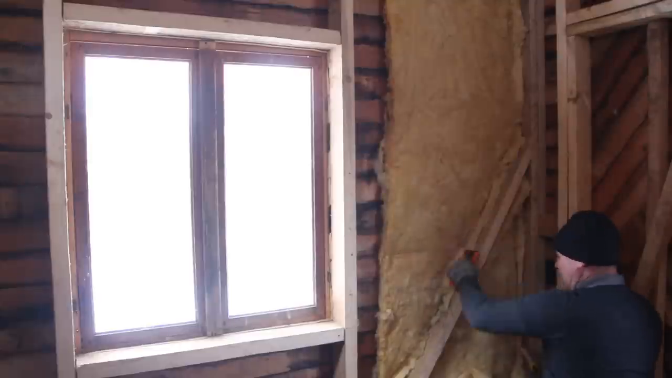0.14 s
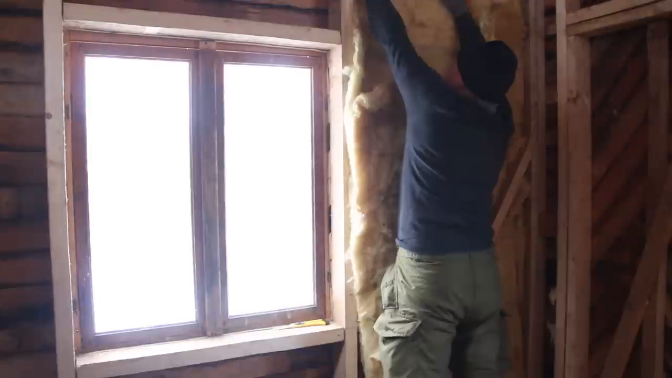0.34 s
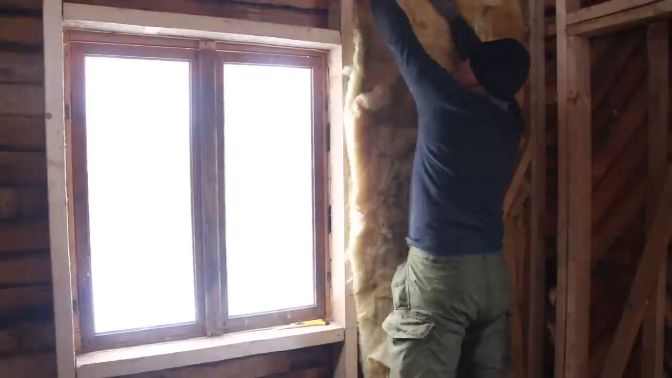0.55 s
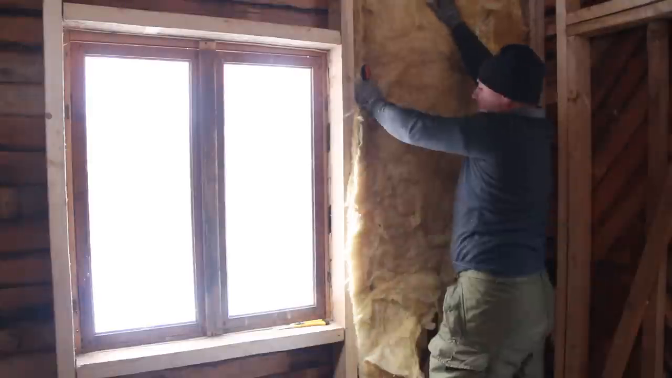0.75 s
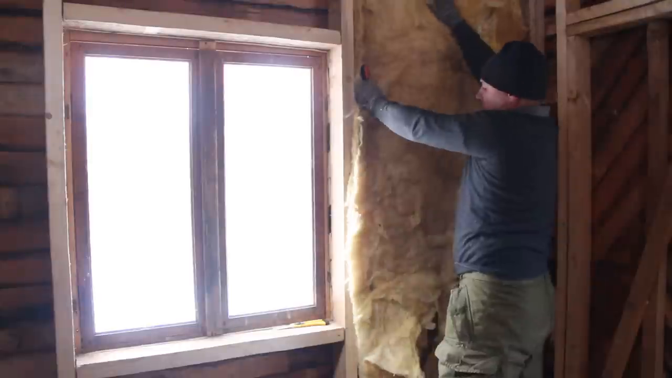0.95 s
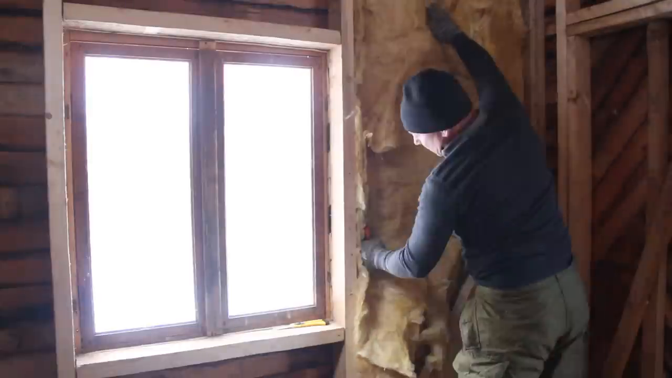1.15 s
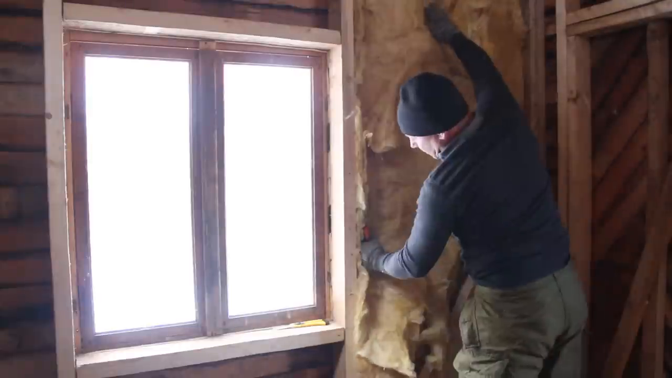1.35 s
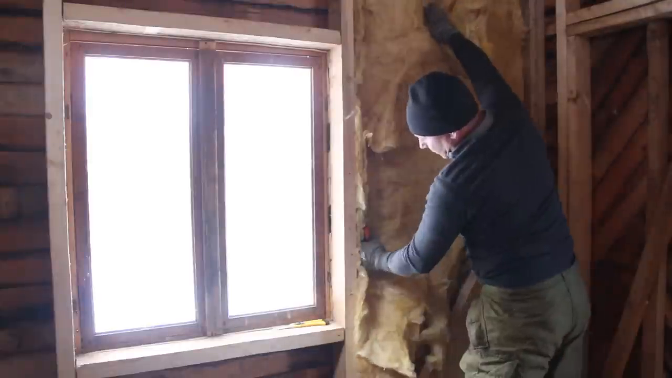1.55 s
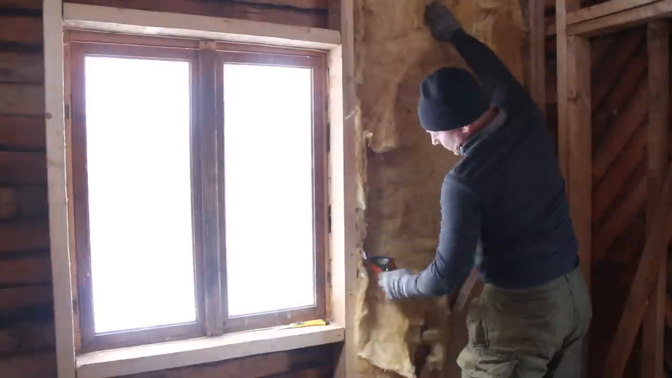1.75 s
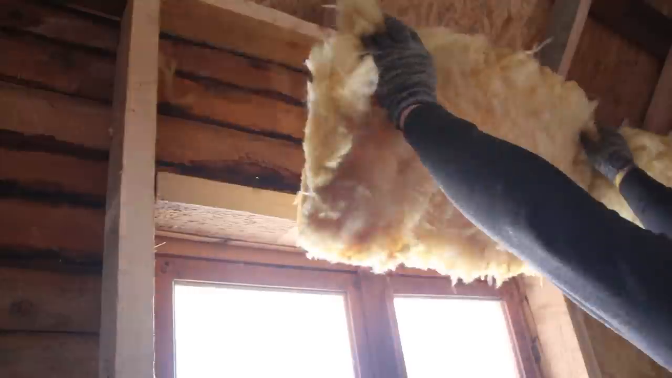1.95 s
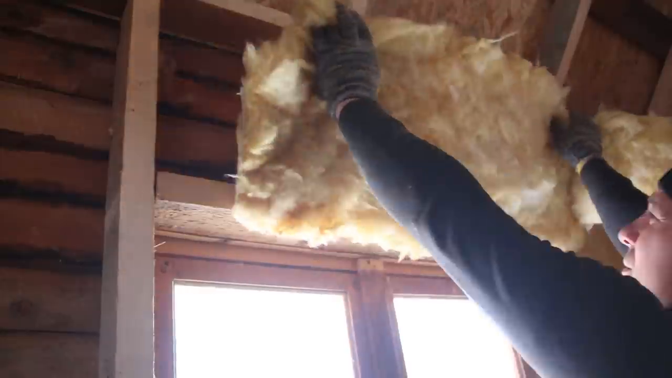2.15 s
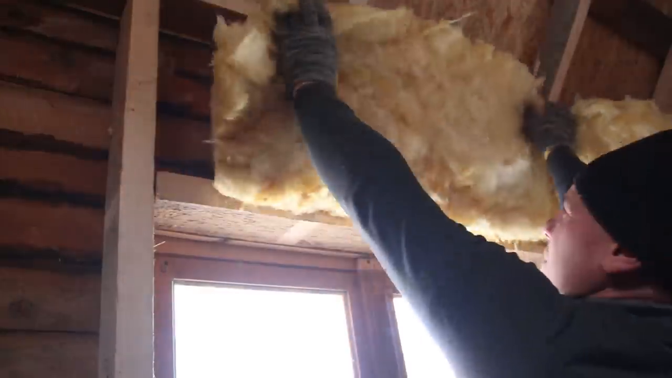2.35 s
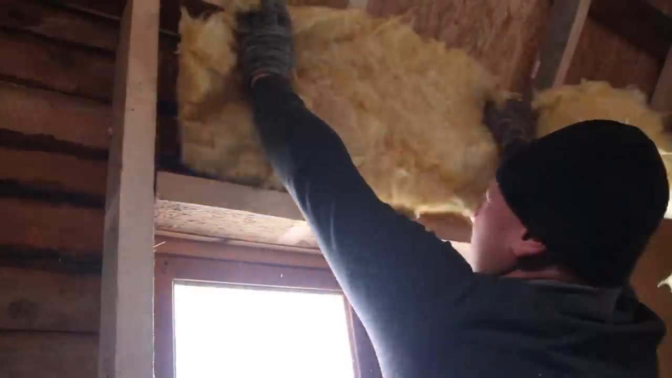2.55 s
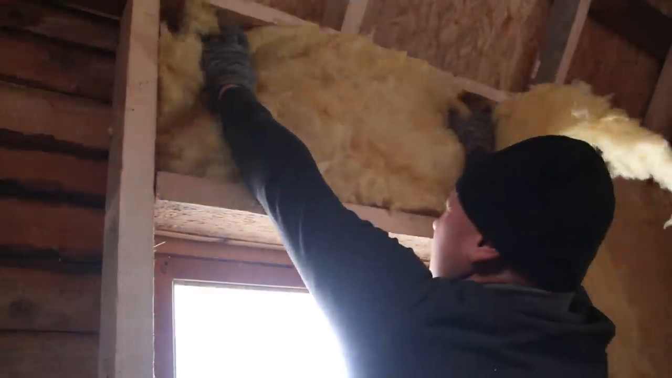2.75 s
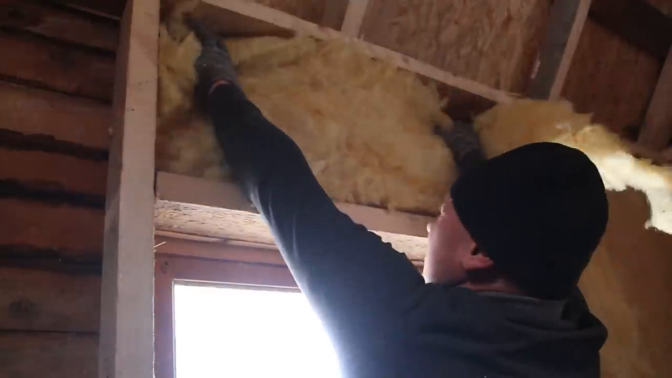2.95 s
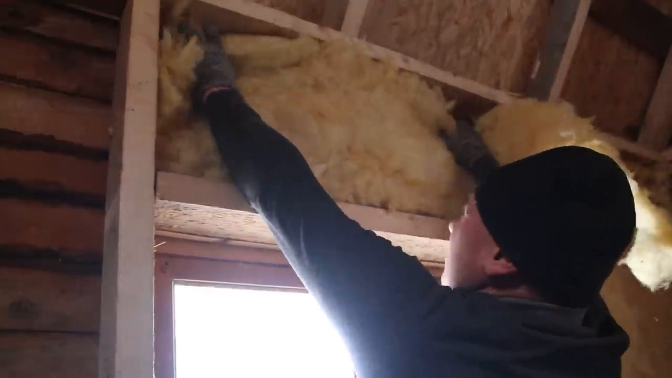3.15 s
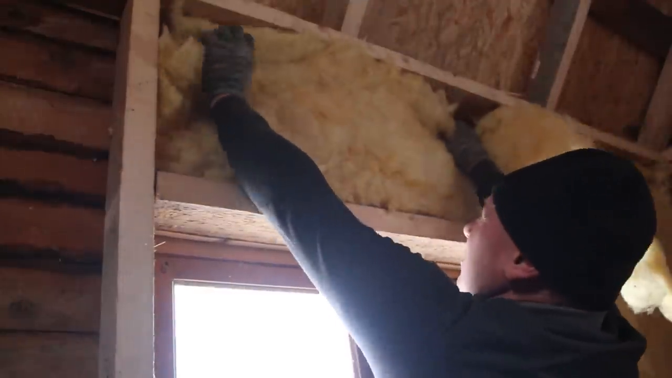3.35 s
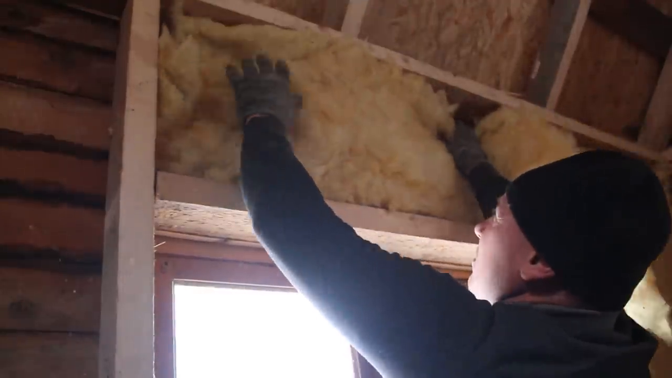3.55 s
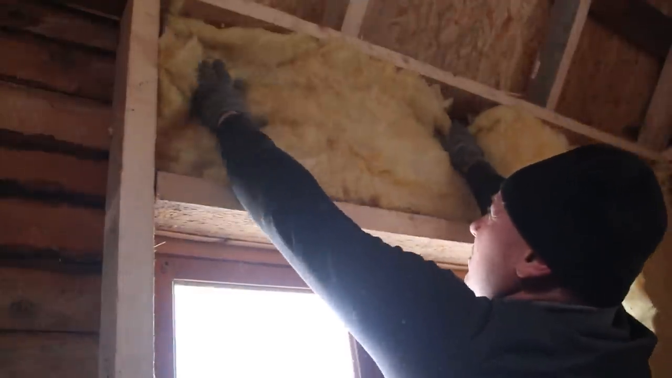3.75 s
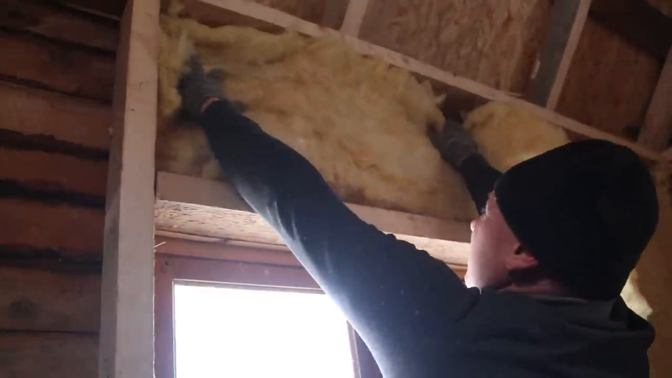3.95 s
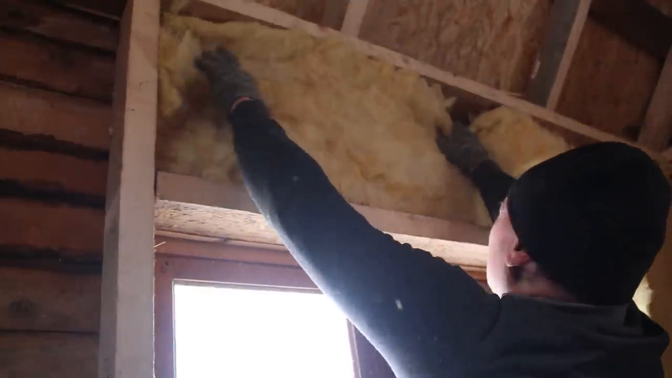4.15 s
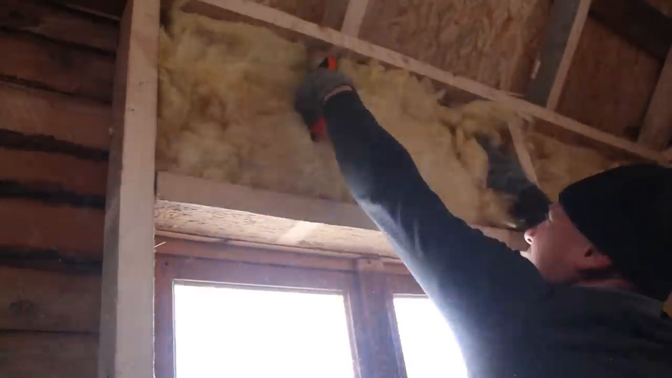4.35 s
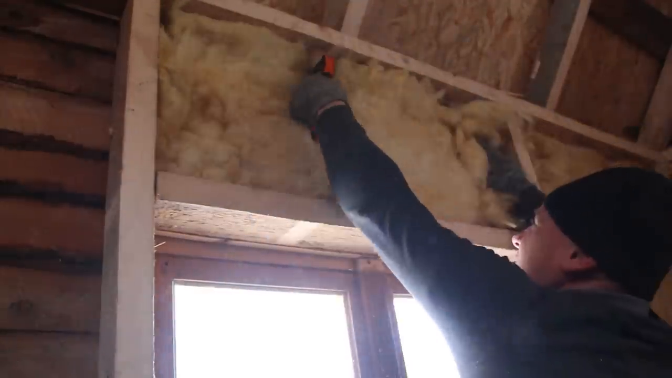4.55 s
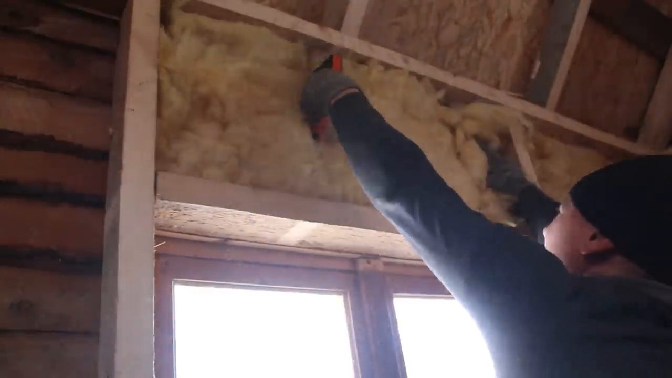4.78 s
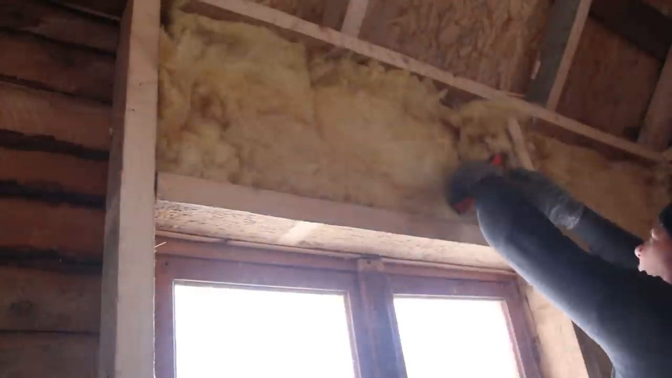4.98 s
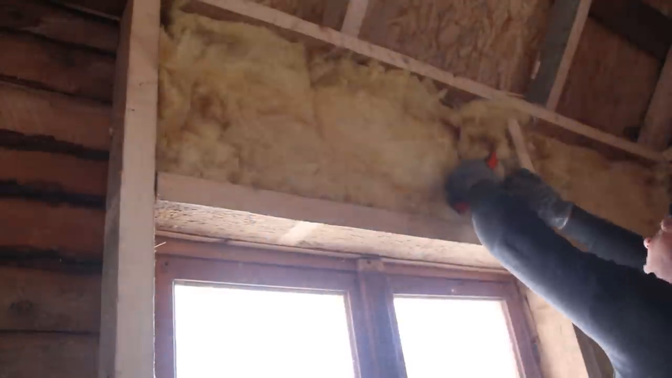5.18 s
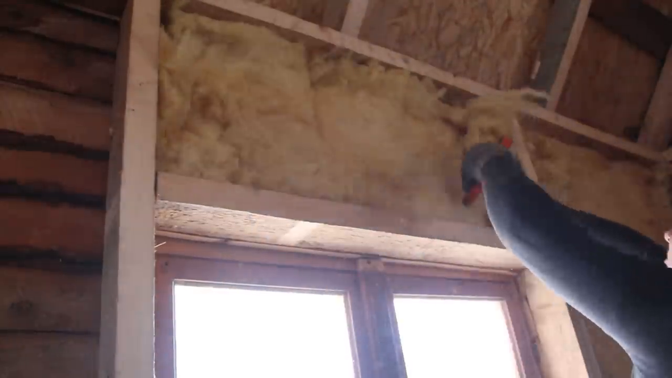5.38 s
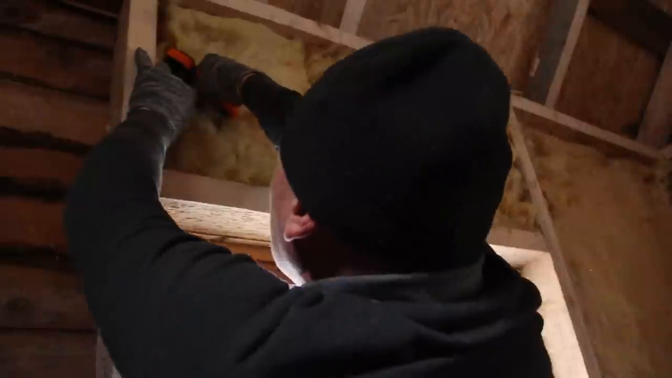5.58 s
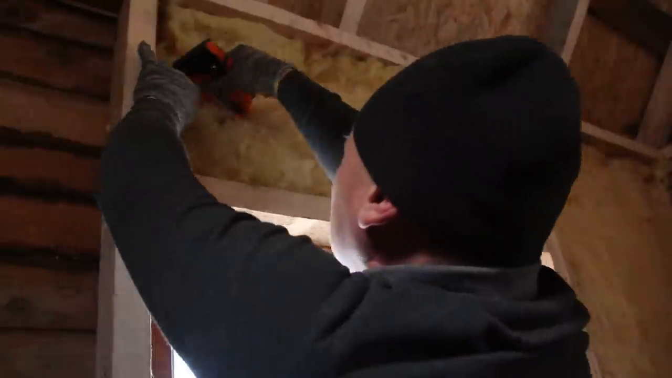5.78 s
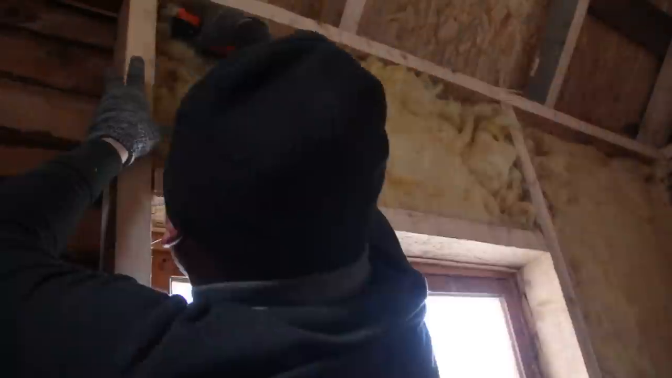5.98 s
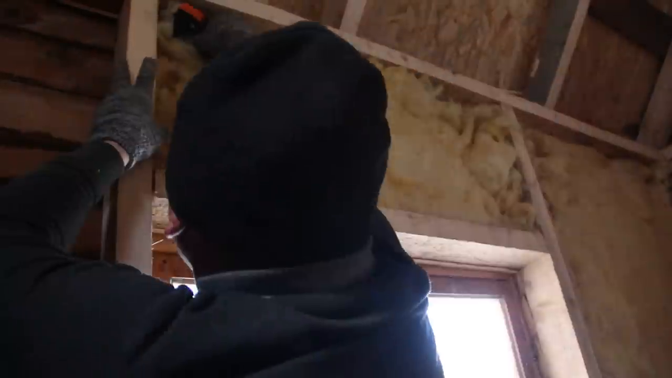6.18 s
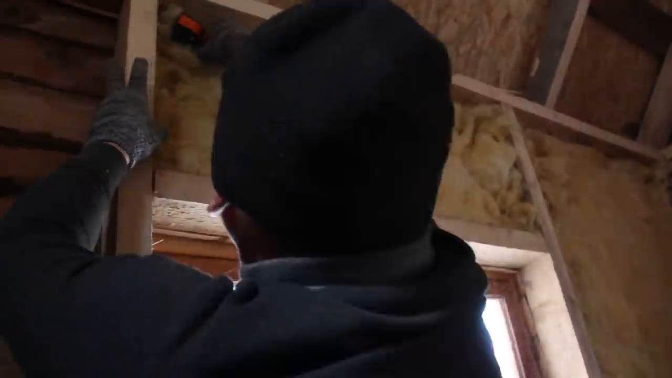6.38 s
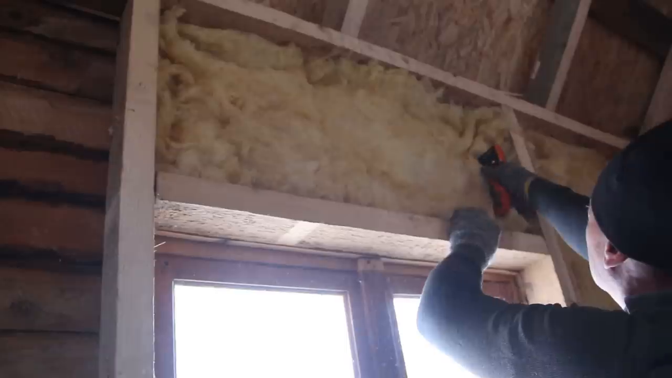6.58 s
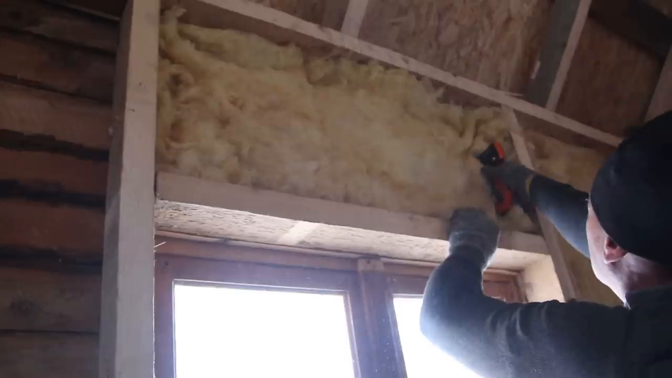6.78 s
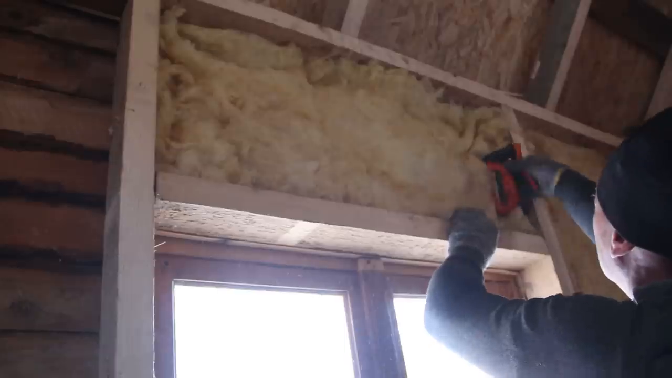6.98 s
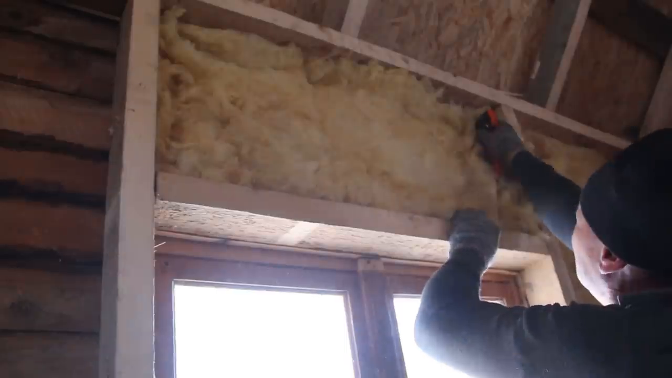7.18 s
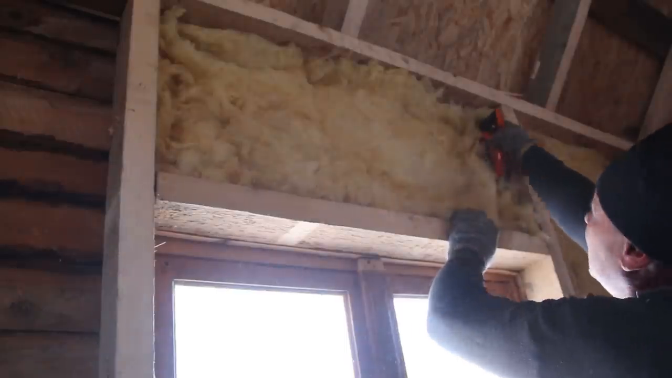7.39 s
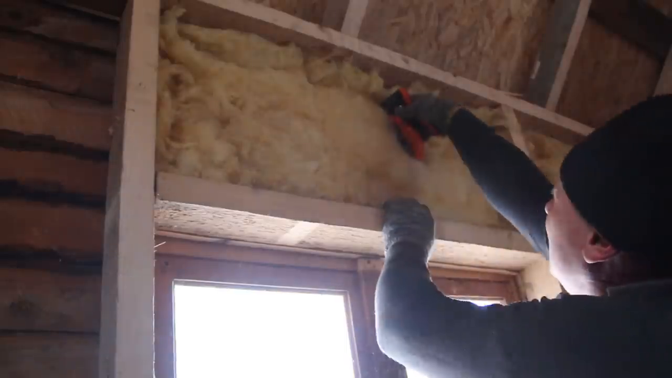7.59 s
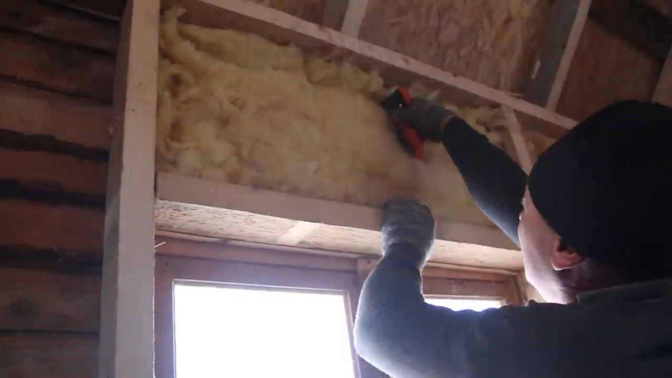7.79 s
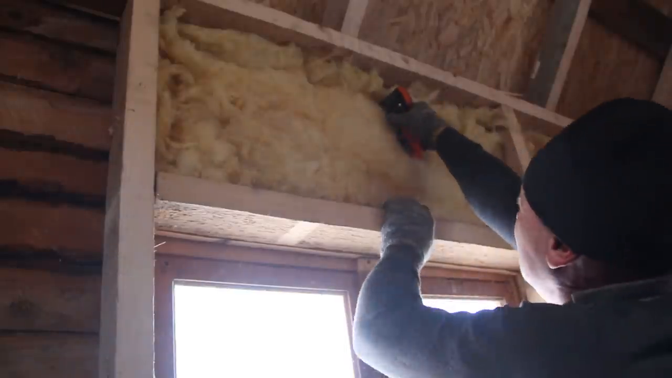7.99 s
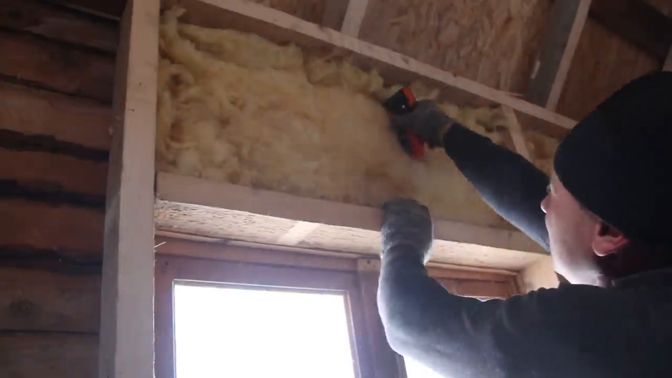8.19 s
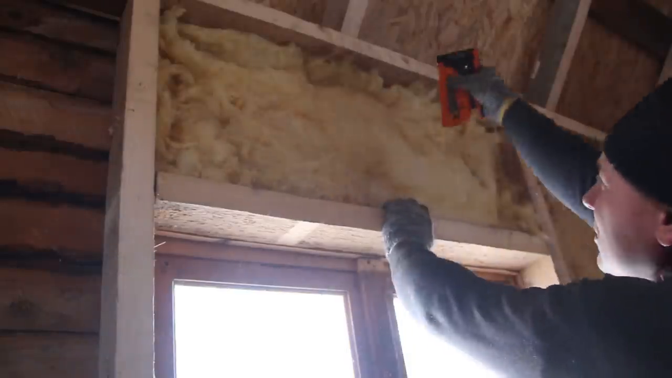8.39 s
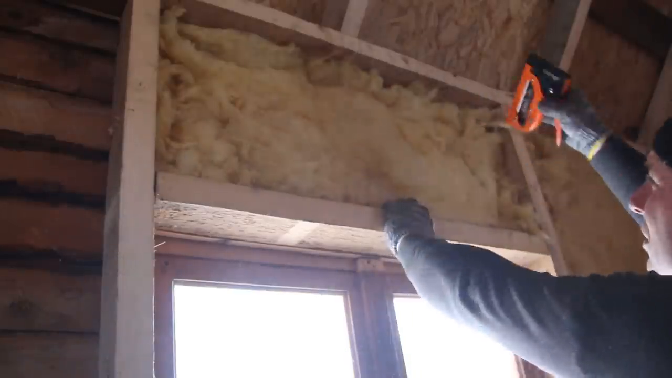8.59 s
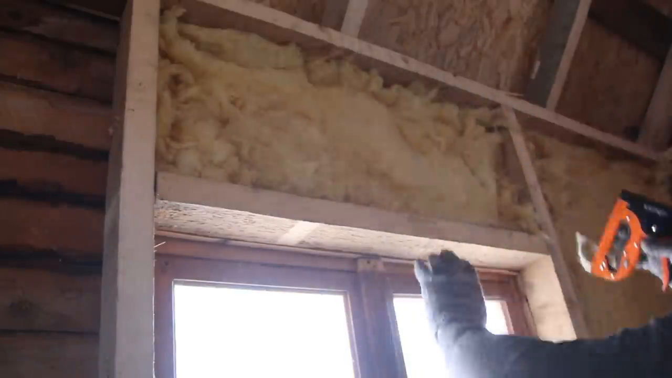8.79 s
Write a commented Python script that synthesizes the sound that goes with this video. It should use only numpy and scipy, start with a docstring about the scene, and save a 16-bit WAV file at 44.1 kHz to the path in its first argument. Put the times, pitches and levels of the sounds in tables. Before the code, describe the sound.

A hand staple gun snaps sharply into wood in two runs, with lever clicks and soft rustling of insulation in a small room.

```python
"""Sharp snaps, hard enough to overload the microphone: a hand staple gun drives staples into a timber
frame in a bare attic room. Each impact excites modes of the gun's steel, the stud and the wall, and the
lever ticks before and after. The floor booms under shots and shifting feet, and gloves rub mineral wool
into a rustle. At set instants all ringing breaks off and the rustle jumps in level."""
import sys
import numpy as np
from scipy import signal
from scipy.fft import rfft, irfft, next_fast_len
from scipy.io import wavfile
from scipy.ndimage import uniform_filter1d

SR = 44100
rng = np.random.default_rng(int(sys.argv[2]) if len(sys.argv) > 2 else 0)


def file_out(sig):
    """Save sig as 16-bit WAV at sys.argv[1]."""
    # one column per channel
    cols = np.atleast_2d(sig).T
    # limit, then scale
    lim = np.clip(cols, -1, 1)
    pcm = np.round(lim * 32767).astype(np.int16)
    wavfile.write(sys.argv[1], SR, pcm)


N = 389388
T = np.arange(SR // 2) / SR

# Instants in seconds at which all ringing breaks off.
BREAKS = [0.211, 1.186, 1.852, 4.452, 4.917, 5.458, 6.029, 6.56, 7.078, 7.574, 8.31]
# Staple shots. Each row: start in seconds, relative level in dB, steel colour in Hz, colour level in dB,
# stud level in dB, stud pitch in Hz, wall level in dB.
SHOTS = [(-0.09, -4, 3430, -19, 1.5, 506, -2), (0.393, 8, 3730, -4.5, -7, 423, -18),
         (0.854, 6.5, 3750, -7, 2, 480, -2.5), (1.433, 8, 2730, -40, 1, 420, -3),
         (4.613, 7.5, 4440, -17.5, 0, 530, -8), (5.120, 4.5, 4000, 0.5, -23, 550, -11),
         (5.648, 8, 3440, -27, 1.5, 331, -10.5), (6.204, 6, 4300, -9.5, -1, 766, -1.5),
         (6.739, 7.5, 4480, -11, -5, 705, -10.5), (7.271, 3, 4040, 4.5, -12.5, 734, -12.5),
         (8.038, 9, 1610, 5, 0.5, 530, -1.5)]


def staple_shots():
    """Impact excitation: the driver slams home with a broadband crack and rings steel, stud and wall."""
    out, t = np.zeros(N), T[:4096]
    for shot, tail in zip(SHOTS, room_tails(len(SHOTS))):
        start, db, colour_hz, colour_db, stud_db, stud_hz, wall_db = shot
        crack = rng.standard_normal(len(t)) * decay(t, 0.0051)
        crack[0] = 21.3  # the impulse of first contact
        crack = butterworth(crack, 2, 300., "high")
        facing = resonate(crack, colour_hz, q=1.09)  # the way the gun faces lifts one broad band
        body = steel_modes(colour_hz, db_per_octave=4.5, t60_scale=0.3)
        stud = wood_knock(t, stud_hz, t60=0.022, push_s=0.00061)
        wall = wood_knock(t, hz=252.5, t60=0.042, push_s=0.0012)
        gun = amp(5.5) * unit(crack) + amp(colour_db) * unit(facing) + amp(0.5) * unit(body)
        timber = amp(stud_db) * unit(stud) + amp(wall_db) * unit(wall)
        add_in_room(out, start, amp(db) * (gun + timber) / 16, tail, wet_db=-24.)
    return out


def steel_modes(colour_hz, db_per_octave, t60_scale):
    """Modal superposition: a blow favours the gun's modes near its colour, never twice alike."""
    # Each row: frequency in Hz, relative level in dB, t60 in seconds before scaling.
    modes = [(1523, 2, 0.14), (1960, -4.5, 0.18), (2754, 1, 0.098), (2940, -1.5, 0.11), (3277, 3.5, 0.074),
             (3920, -21, 0.057), (4900, -18.5, 0.031), (5135, 1.5, 0.13), (6000, -10.5, 0.029),
             (6910, 10, 0.089), (8470, -5.5, 0.066), (9610, 13, 0.075)]
    hz, db, t60 = np.transpose(modes)[:, :, None]
    scatter, detune = rng.standard_normal((2, len(modes), 1))
    gain = amp(db - db_per_octave * np.abs(np.log2(hz / colour_hz)) + 1.5 * scatter)
    return (gain * ring(T[:4096], hz * (1 + 0.0081 * detune), t60_scale * t60)).sum(0)


def wood_knock(t, hz, t60, push_s):
    """Forced response: a short push drives two wood modes, which radiate little below their pitch."""
    push = np.hanning(int(push_s * SR) + 3)
    modes = ring(t, hz, t60) - 0.54 * ring(t, hz * 1.58, .5 * t60)
    return butterworth(np.convolve(modes, push)[:len(t)], 2, hz * 0.57, "high")


def lever_ticks():
    """Contact transients: steel parts click, longer when hit harder, and ring briefly with the gun."""
    # Lever ticks, slips of the catch and knocks of the gun. Each row: time in seconds, peak in dB,
    # pitch in Hz, relative echo level in dB, level of the struck part's note in dB.
    contacts = [(0.119, -30, 2300, 0.5, -1), (0.278, -32, 3600, -1, -12), (0.353, -37.5, 6000, -1, -6),
                (0.376, -37, 4200, 10, -17), (.386, -36, 3970, 2, -11), (0.752, -30.5, 3420, 3.5, -16),
                (0.824, -41, 1700, 3, -18), (0.847, -29.5, 3900, 14, -5), (1.099, -46, 1820, 15.5, -6),
                (1.175, -9, 1660, 5.5, -32), (1.263, -40, 4300, 1, -16), (1.288, -41.5, 4440, 7, -13),
                (1.339, -33.5, 4380, 4.5, -22), (1.364, -26, 1780, 4, -3), (1.426, -23, 2560, 4, -13),
                (1.555, -33, 1980, -1, -4), (1.659, -16, 1810, 11, -6), (1.767, -4.5, 2020, 1, -26),
                (2.601, -34.5, 1500, 14, -19), (3.991, -32.5, 1264, 1, -12), (4.417, -41.5, 4700, -2, -19),
                (4.476, -28, 4580, -2.5, -9), (4.595, -18, 2600, 4, 1), (4.849, -39, 3530, 9.5, -10),
                (5.036, -26.5, 3030, -1, -21), (5.100, -26, 1970, 4.5, -8), (5.362, -35.5, 1545, 6.5, -16),
                (5.54, -24, 4140, -1.5, -8), (5.613, -19.5, 2100, -2, -1), (5.633, -24, 4960, -1, -21),
                (5.818, -19, 1590, -0.5, -26), (6.132, -23, 4180, -1.5, -17), (6.182, -17, 1900, -5, -2),
                (6.197, -8.5, 4440, 8, -30), (6.396, -33.5, 1284, 1, -5), (6.458, -37.5, 1850, 9, -4.5),
                (6.634, -23.5, 4050, -3.5, -29), (6.708, -22, 3930, -6.5, -6), (6.73, -15.5, 4550, -3, -15),
                (6.929, -25, 1740, -0.5, -14), (7.037, -7.5, 3200, -2, -24), (7.133, -19.5, 5400, -3.5, -9),
                (7.194, -24, 4060, -6, -6), (7.229, -17.5, 5530, -2.5, -19),
                (7.492, -27.5, 1750, -0.5, -11), (7.61, -31.5, 1960, 1.5, -4), (7.893, -19, 6040, -3, -2),
                (8.007, -21, 1850, -1.5, -7), (8.031, -10.5, 4400, -4, -20), (8.251, -33, 1570, 7.5, -5),
                (8.35, -42.5, 1500, -6, 5), (8.505, -42, 1400, 6, 8), (8.568, -2.5, 1540, -4.5, -15.5)]
    out, t = np.zeros(N), T[:2048]
    for (start, db, hz, echo_db, note_db), tail in zip(contacts, room_tails(len(contacts))):
        envelope = ramp(t, 0.00022) * decay(t, 0.013 + 0.021 * amp(db))
        click = butterworth(rng.standard_normal(len(t)) * envelope, 3, hz / 1.86, "high")
        click = butterworth(click, 2, 11000., "low")
        body = steel_modes(hz, db_per_octave=11.0, t60_scale=0.12)[:len(t)]
        tick = unit(click) + amp(-9.5) * unit(body) + amp(note_db) * unit(ring(t, hz, t60=0.0087))
        add_in_room(out, start - .0005, amp(db) * tick / np.abs(tick).max(), tail, echo_db - 27.0)
    return out


def board_thumps():
    """Soft impact: a boot or knee stays long on the boards, so the blow carries little treble."""
    # Each row: start in seconds, peak in dB, pitch in Hz.
    blows = [(1.867, -35.5, 214), (2.146, -37, 220), (2.6, -43, 220), (7.616, -31.5, 245),
             (7.901, -36, 274), (8.007, -22.5, 625)]
    out = np.zeros(N)
    for (start, db, hz), tail in zip(blows, room_tails(len(blows))):
        thump = wood_knock(T[:4096], hz, t60=0.023, push_s=0.0031)
        add_in_room(out, start, amp(db) * thump / np.abs(thump).max(), tail, wet_db=-26.)
    return out


def floor_boom():
    """Resonance: low modes of boards and joists swell at each shake, decay, and stir faintly all along."""
    # Shots and shifts of weight. Each row: start, swell, hold and t60 of the boards in seconds,
    # board level in dB, board pitch in Hz, joist level in dB.
    shakes = [(-.02, 0.019, 0.13, 0.74, -28, 82.2, -48), (0.398, 0.061, 0.13, 0.34, -30, 83.4, -54),
              (0.861, 0.13, 0.15, 0.59, -27, 81.3, -51), (1.436, .15, 0.038, 0.37, -21.5, 83.7, -35),
              (1.727, .05, 0.068, .5, -31.5, 82, -42), (1.857, 0.017, 0.042, 0.3, -14, 75.4, -11),
              (2.137, 0.03, 0.067, 0.67, -13.5, 78.1, -28), (2.404, 0.04, .03, 0.56, -19.5, 80.7, -31),
              (2.583, 0.022, 0.069, 0.37, -19, 79.4, -22.5), (3.097, 0.12, 0.32, 0.8, -38, 75.9, -60),
              (3.301, 0.13, .1, 0.78, -51, 80, -36.5), (3.782, 0.058, 0.07, 1.8, -42, 76.6, -45),
              (4.474, 0.071, 0.061, .5, -43, 80, -66), (4.613, 0.037, .06, 0.36, -21.5, 78.2, -31),
              (4.86, 0.029, .03, 0.37, -32, 76, -47), (5.121, 0.052, 0.053, 1.4, -31.5, 73.4, -34.5),
              (5.65, 0.047, 0.035, 0.21, -15.5, 83, -40), (5.82, 0.043, 0.074, 0.35, -33, 76.3, -39),
              (6.206, 0.06, 0.07, 0.57, -32, 84.3, -34), (6.74, 0.035, 0.035, 0.74, -24.5, 78.2, -53),
              (6.98, 0.02, 0.048, .5, -34, 79, -56), (7.148, 0.022, 0.13, 0.53, -38.5, 79.7, -42),
              (7.274, .04, 0.046, .8, -39, 81.5, -49), (7.61, 0.044, 0.028, 0.87, -22.5, 77, -56.5),
              (7.898, .06, 0.24, .4, -32.5, 76.7, -52), (8.042, .05, 0.11, .4, -42, 78, -41),
              (8.297, 0.02, 0.053, .7, -37.5, 77.8, -41), (8.469, .04, 0.21, 0.28, -37.5, 79.2, -63),
              (8.619, .05, 0.061, .3, -38, 71.6, -34)]
    joist_hz = 49.56
    out, t = np.zeros(N), np.arange(2 * SR) / SR

    def mode(hz, swell, hold, t60):
        rise = np.sin(np.pi / 2 * ramp(t, swell)) ** 2
        fall = decay(np.maximum(t - swell - hold, 0), t60)
        return np.sqrt(2) * rise * fall * np.sin(2 * np.pi * hz * t)

    def stir(hz, q):
        return unit(resonate(resonate(rng.standard_normal(N), hz, q), hz, q))

    for start, swell, hold, t60, boards_db, boards_hz, joist_db in shakes:
        boards = amp(boards_db) * mode(boards_hz, swell, hold, t60)
        joists = amp(joist_db) * mode(joist_hz, swell=0.072, hold=0, t60=0.95)
        gate = ramp(next_break(start + swell) - start - t, 0.0057)
        mix_in(out, start, (boards + joists) * gate)
    return out + amp(-51.5) * stir(79.6, q=9.2) + amp(-54.5) * stir(joist_hz, q=2.2)


def wool_rustle():
    """Friction noise: sleeves and wool rustle throughout; each glove stroke swells with a thin squeak."""
    # Stretches between breaks. Each row: opening level in dB, closing level in dB, bass gain in dB.
    stretches = [(-52.5, -56.5, 0), (-55, -48.5, 2), (-54.5, -46.5, 2.5), (-41, -54, 1.5), (-54, -48.5, 1),
                 (-57, -49, 1.5), (-49.5, -48.5, -3), (-46, -51, 1.5), (-50.5, -45, -2.5), (-46.5, -49, -1),
                 (-52, -59, 4), (-49.5, -53, 0)]
    # Glove strokes. Each row: centre in seconds, half length in seconds, level in dB.
    strokes = [(.128, 0.032, -60), (1.707, 0.047, -62), (1.916, 0.048, -32), (2.615, 0.075, -51.5),
               (2.836, 0.036, -57), (2.967, 0.024, -49), (3.066, 0.059, -53.5), (3.373, 0.085, -43),
               (3.93, 0.095, -45), (4.127, 0.042, -57.5), (4.944, 0.015, -66), (7.662, 0.059, -71),
               (8.566, 0.015, -47), (8.644, 0.089, -52)]
    # Spectra of rustle and stroke. Each row: frequency in Hz, relative spectral density in dB.
    rustle_spectrum = [(65, -32), (110, -8), (140, -20), (233, -20.5), (264, -19), (444, -20.5), (703, -23),
                       (1870, -26), (2210, -29), (4680, -32), (16000, -39)]
    stroke_spectrum = [(120, -51), (200, -9.5), (432, -0.5), (1160, -6.5), (1270, -10.5), (1870, -10),
                       (2130, -7.5), (4040, -6), (12200, -7.5), (16000, -26)]
    recoil_db, recoil_s = 9.5, 0.18
    t = np.arange(N) / SR
    edges, stretch = np.r_[0, BREAKS, N / SR], np.searchsorted(BREAKS, t)
    open_db, close_db, bass_db = np.transpose(stretches)[:, stretch]
    rustle_db = open_db + (close_db - open_db) * (t - edges[stretch]) / np.diff(edges)[stretch]
    for start, *_ in SHOTS:  # the arm's recoil lifts the rustle
        after_shot = (t > start) & (stretch == np.searchsorted(BREAKS, start))
        rustle_db += recoil_db * np.exp(-np.abs(t - start) / recoil_s) * after_shot
    swells = sum(amp(db) * np.exp(-np.abs((t - centre) / half) ** 2.6) for centre, half, db in strokes)
    centres = 110 * 2 ** np.arange(0, 7.3, .5)
    rustle, stroke = 0, 0
    for hz, band in zip(centres, noise_bands(next_fast_len(N, True), centres)[:, :N]):
        band = band * amp(3.3 * flicker(rate_hz=11.0))
        bass_share = np.clip(np.log2(1600 / hz), 0, 1)
        rustle += amp(at_frequency(rustle_spectrum, hz) + bass_share * bass_db) * band
        stroke += amp(at_frequency(stroke_spectrum, hz)) * band
    squeak = amp(-15.5) * unit(resonate(rng.standard_normal(N), hz=1870, q=45.))
    fibre_crackle = amp(0.33 * uniform_filter1d(rng.exponential(1., N) ** 2 - 2, size=60))
    return fibre_crackle * (amp(rustle_db) * unit(rustle) + swells * (unit(stroke) + squeak))


def room_tails(count, gap_s=0.00069, rise_s=0.0034):
    """Diffuse reverberation at several spots: dense reflections, each band fading at its own rate."""
    # Each row: frequency in Hz, reverberation time t60 in seconds.
    reverberation = [(100, 0.64), (200, 0.35), (420, 0.27), (1100, 0.25), (2900, 0.22), (7700, 0.17),
                     (15000, 0.098)]
    centres, length = 70 * 2 ** np.arange(0, 8.5, .5), 1 << 17
    noise = noise_bands(length, centres)
    early_lift = 1 + 0.32 * np.exp(-T / 0.012)  # strong echoes off the nearest studs and boards
    fade = decay(T, at_frequency(reverberation, centres)[:, None]) * ramp(T - gap_s, rise_s) * early_lift
    return [(noise[:, k:k + len(T)] * fade).sum(0) for k in rng.integers(0, length - len(T), count)]


def add_in_room(out, start, direct, tail, wet_db):
    """Convolution: the direct sound and its echoes add up, lasting until the next break at most."""
    heard = signal.fftconvolve(direct, amp(wet_db) * tail)[:len(T)]
    heard[:len(direct)] += direct
    mix_in(out, start, heard * ramp(next_break(start) - start - T, 0.0064))


def mix_in(out, start, sound):
    offset = int(round(start * SR))
    first, last = max(offset, 0), min(offset + len(sound), N)
    out[first:last] += sound[first - offset:last - offset]


def next_break(time):
    return min([instant for instant in BREAKS if instant > time] + [N / SR])


def noise_bands(n, centres):
    """Incoherent addition: independent noises in overlapping bands whose powers sum to white."""
    hz = np.maximum(np.fft.rfftfreq(n, 1 / SR), 1.)
    index = np.arange(len(centres))
    position = np.interp(np.log(hz), np.log(centres), index)
    shapes = np.cos(np.pi / 2 * np.clip(position - index[:, None], -1, 1))
    return irfft(rfft(rng.standard_normal((len(centres), n))) * shapes, n)


def flicker(rate_hz):
    """Slow modulation: random steps, smoothed twice."""
    hold = int(SR / rate_hz)
    steps = np.repeat(rng.standard_normal(N // hold + 1), hold)
    return uniform_filter1d(uniform_filter1d(steps, hold), hold)[:N]


def at_frequency(table, hz):
    """Interpolate (Hz, value) rows on a log-frequency axis."""
    frequencies, values = np.transpose(table)
    return np.interp(np.log(np.maximum(hz, 1.)), np.log(frequencies), values)


def resonate(x, hz, q):
    return signal.lfilter(*signal.iirpeak(hz, q, fs=SR), x)


def butterworth(x, order, hz, kind):
    return signal.sosfilt(signal.butter(order, hz, kind, fs=SR, output="sos"), x)


def ring(t, hz, t60):
    return np.sin(2 * np.pi * hz * t) * decay(t, t60)


def decay(t, t60):
    """Exponential damping: 60 dB down after t60 seconds."""
    return 1000. ** (-t / t60)


def ramp(t, seconds):
    return np.clip(t / seconds, 0, 1)


def amp(db):
    return 10 ** (db / 20)


def unit(x):
    """Scale to an RMS of one."""
    return x / np.sqrt(np.mean(x ** 2))


def scene():
    """Superposition: all sources add in one channel."""
    return (staple_shots() + lever_ticks() + board_thumps() + floor_boom() + wool_rustle())[None]


def record(dry):
    """Saturation: the microphone colours the sound, adds hiss, clips the peaks and cuts the top treble."""
    # Each row: frequency in Hz, microphone gain in dB.
    response = [(60, -3), (1500, 3.5), (1900, 6.5), (2200, 0.5), (2900, 3.5), (3500, 5), (4500, 6.5),
                (5300, 3), (6000, 2.5), (6500, -1), (12000, -2.5), (16000, -5.5)]
    hiss_db, ceiling, top_hz = -66.5, 0.48, 15900
    cepstrum = irfft(np.log(amp(at_frequency(response, np.fft.rfftfreq(1024, 1 / SR)))))
    cepstrum[1:512] *= 2  # folding onto positive time gives minimum phase
    cepstrum[513:] = 0
    impulse_response = irfft(np.exp(rfft(cepstrum)))
    coloured = signal.fftconvolve(dry[0], impulse_response)[:N]
    clipped = np.clip(coloured + amp(hiss_db) * rng.standard_normal(N), -ceiling, ceiling)
    return signal.sosfiltfilt(signal.ellip(8, .1, 45, top_hz, fs=SR, output="sos"), clipped)[None]


dry = scene()
out = record(dry)
file_out(out)
```